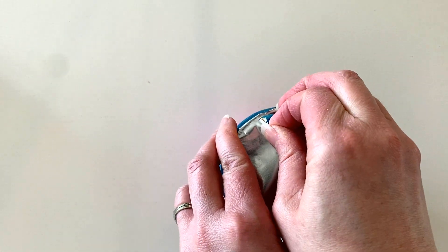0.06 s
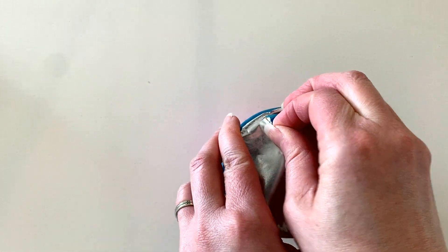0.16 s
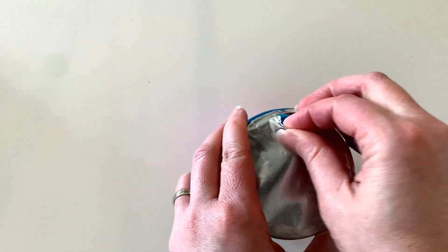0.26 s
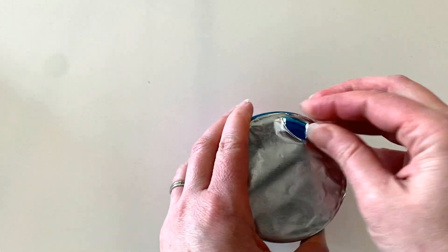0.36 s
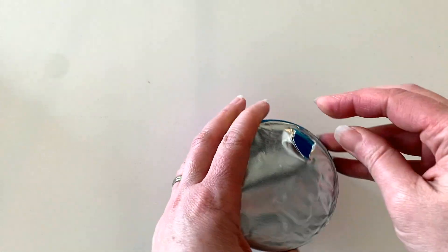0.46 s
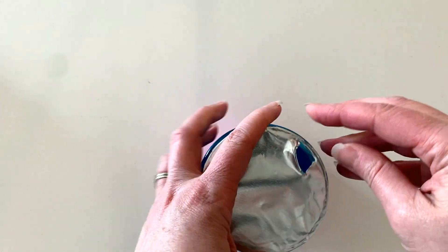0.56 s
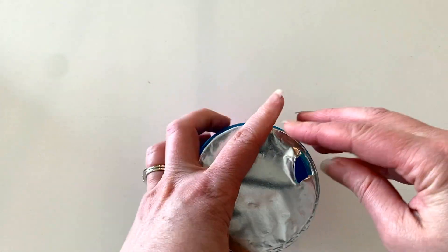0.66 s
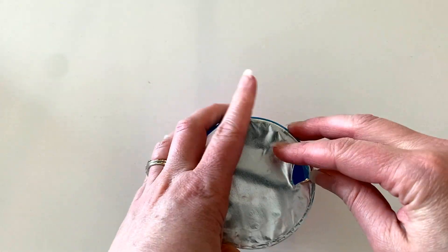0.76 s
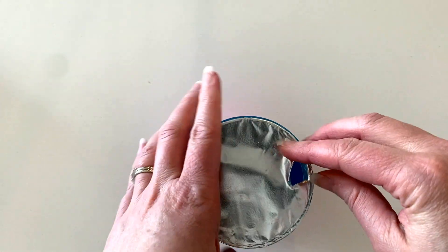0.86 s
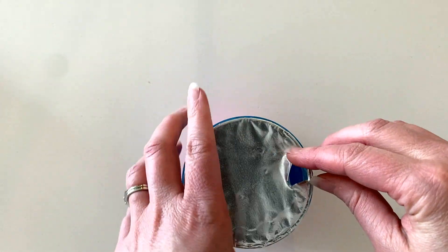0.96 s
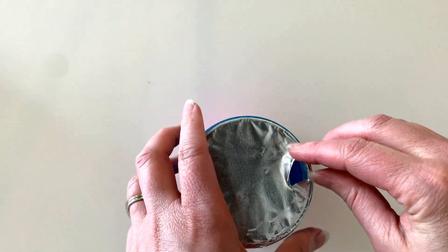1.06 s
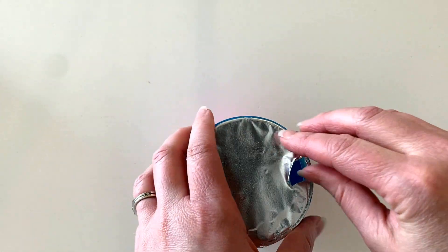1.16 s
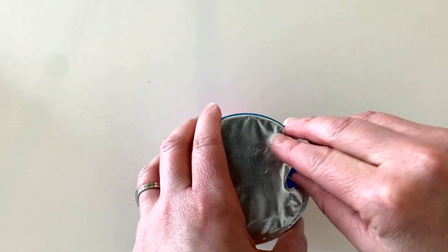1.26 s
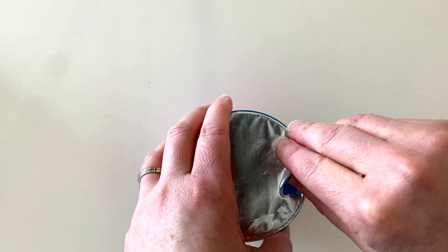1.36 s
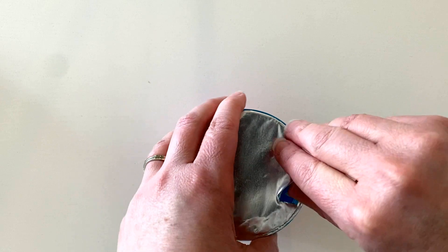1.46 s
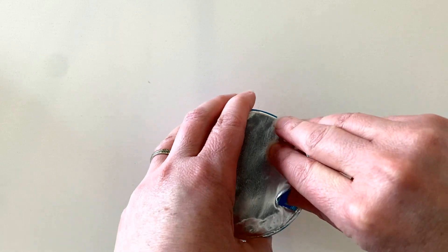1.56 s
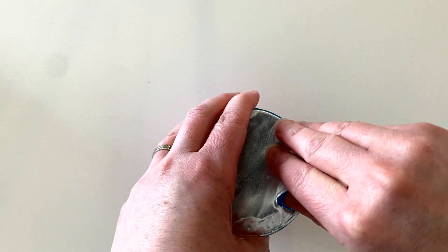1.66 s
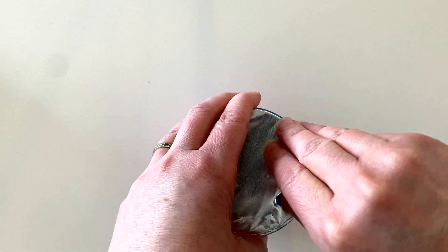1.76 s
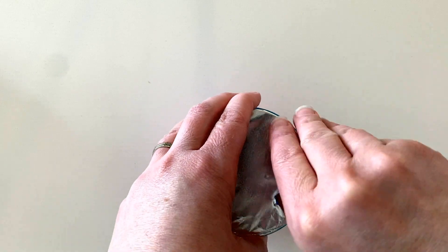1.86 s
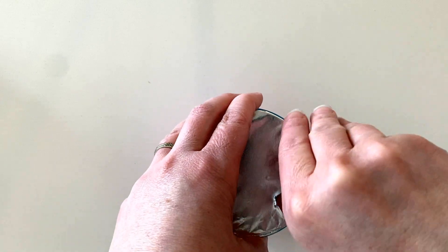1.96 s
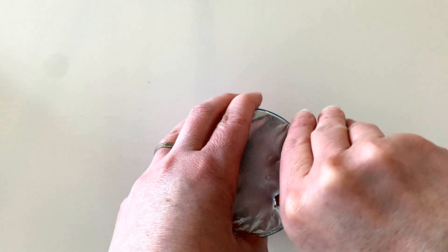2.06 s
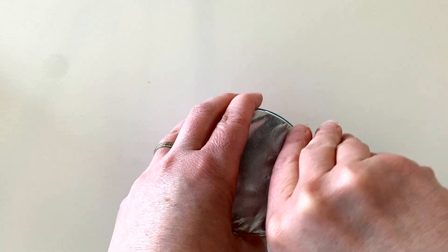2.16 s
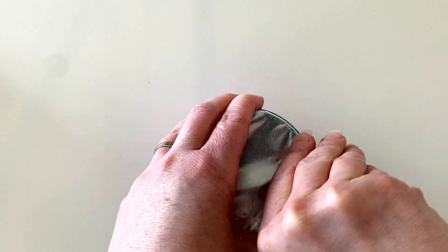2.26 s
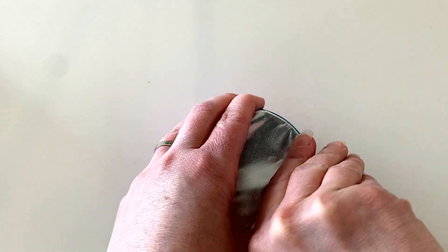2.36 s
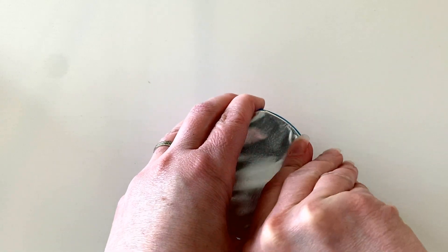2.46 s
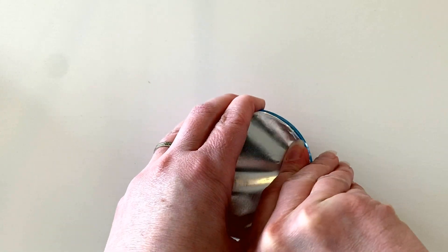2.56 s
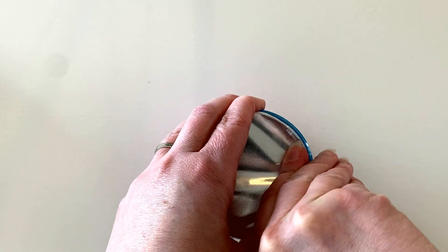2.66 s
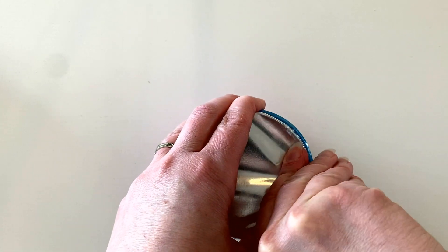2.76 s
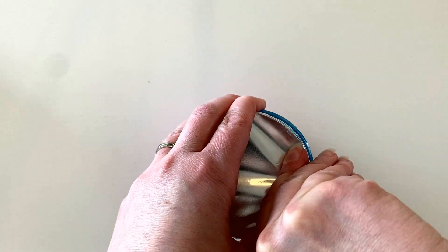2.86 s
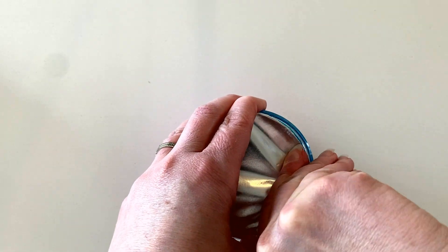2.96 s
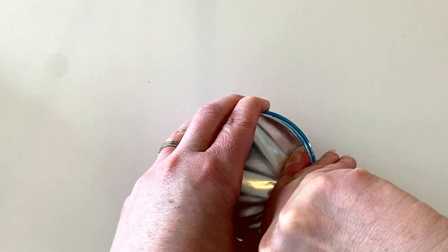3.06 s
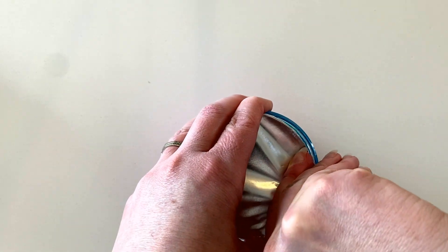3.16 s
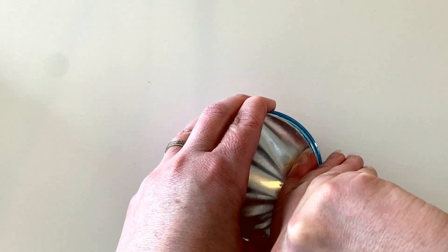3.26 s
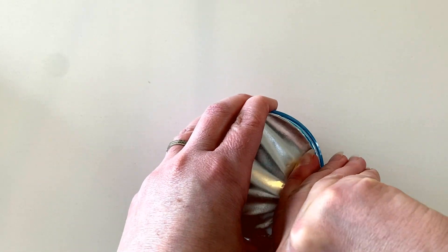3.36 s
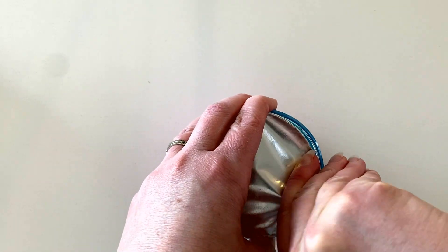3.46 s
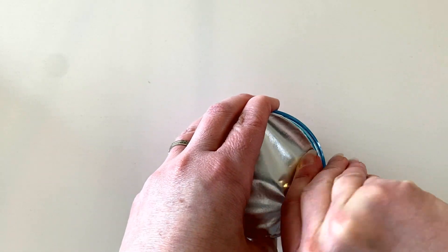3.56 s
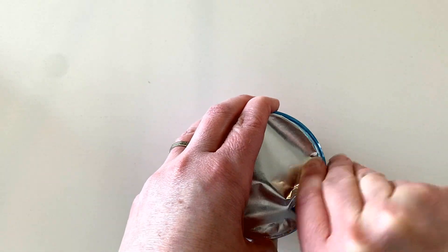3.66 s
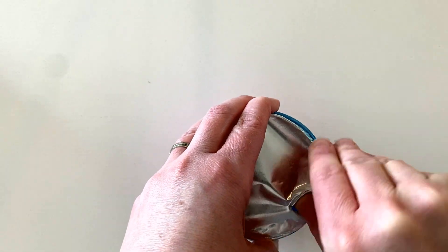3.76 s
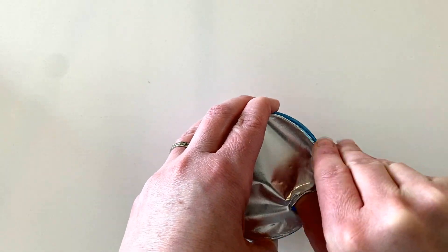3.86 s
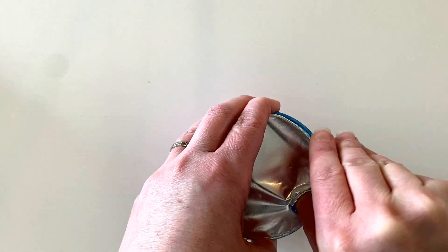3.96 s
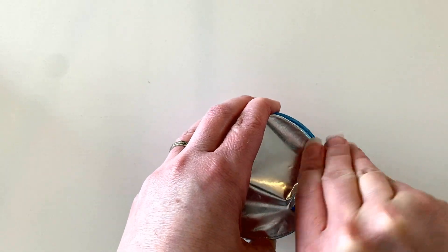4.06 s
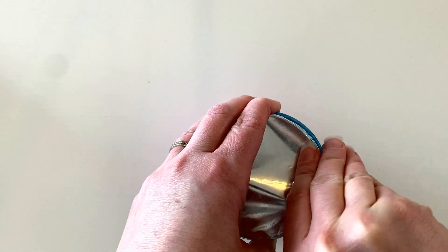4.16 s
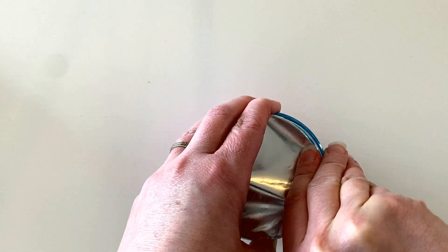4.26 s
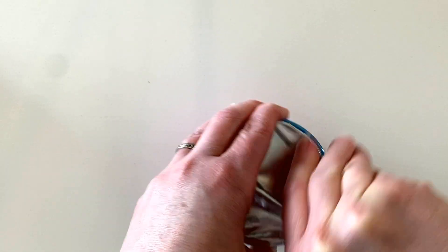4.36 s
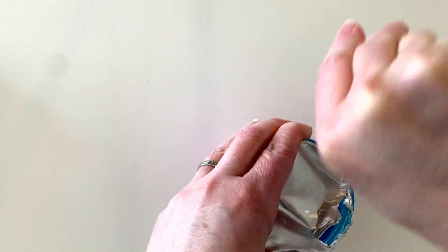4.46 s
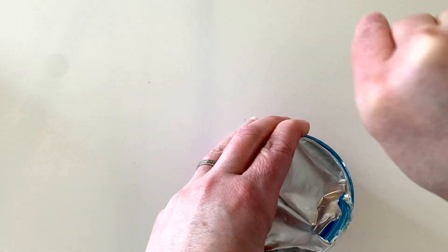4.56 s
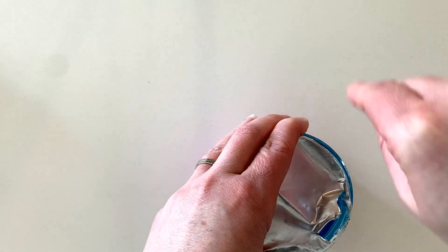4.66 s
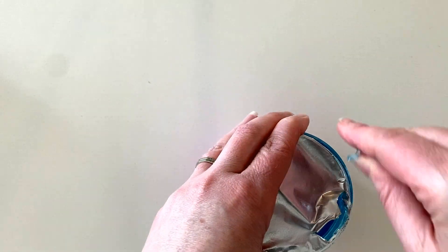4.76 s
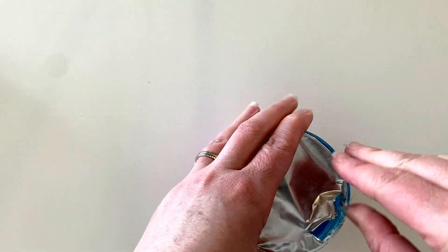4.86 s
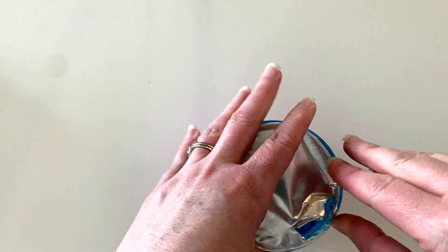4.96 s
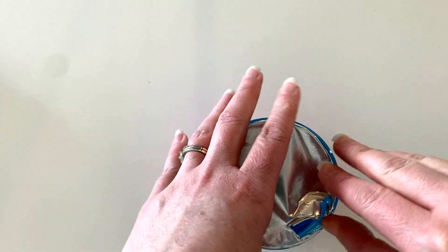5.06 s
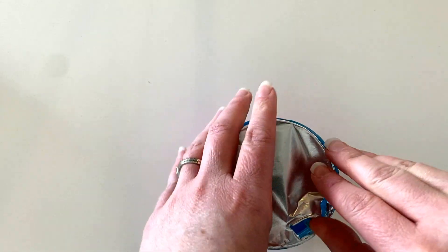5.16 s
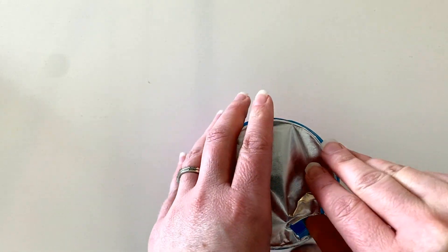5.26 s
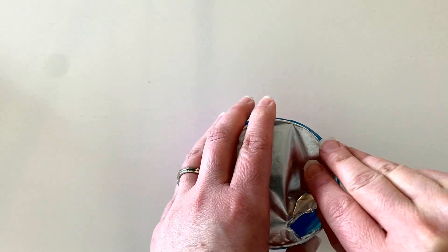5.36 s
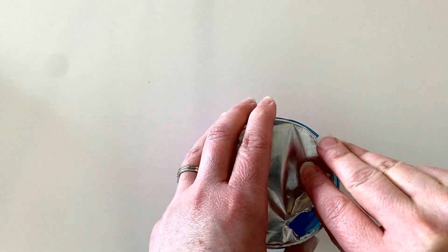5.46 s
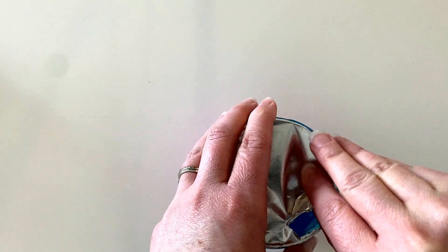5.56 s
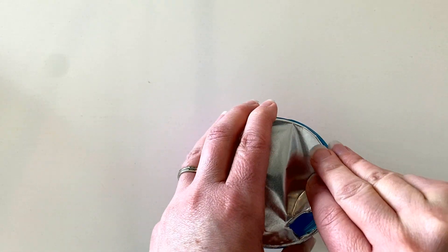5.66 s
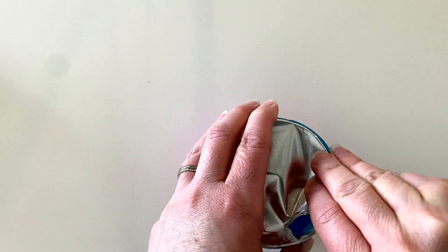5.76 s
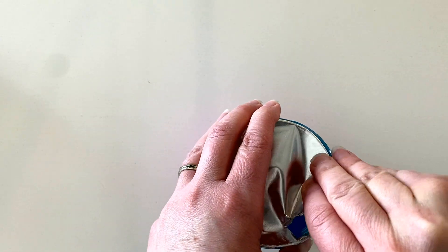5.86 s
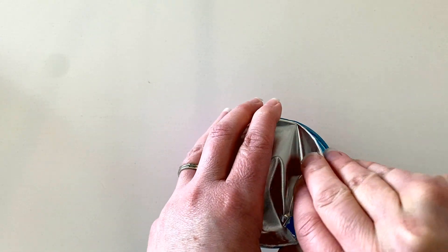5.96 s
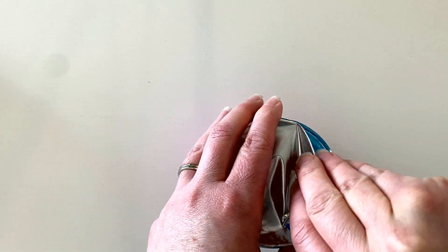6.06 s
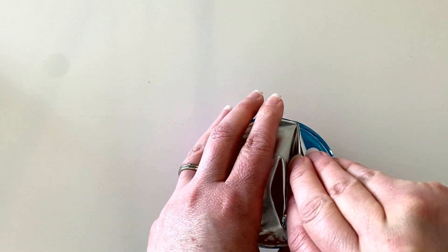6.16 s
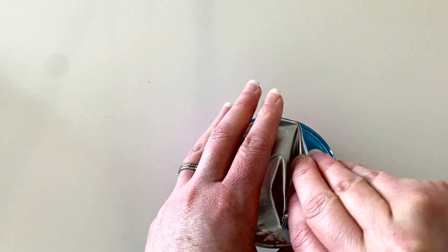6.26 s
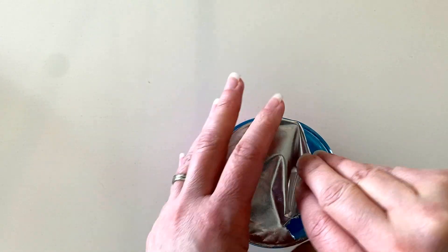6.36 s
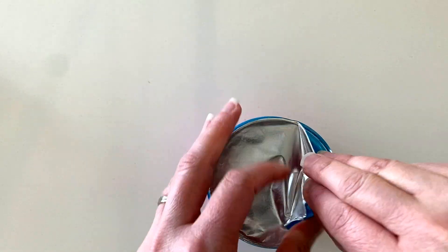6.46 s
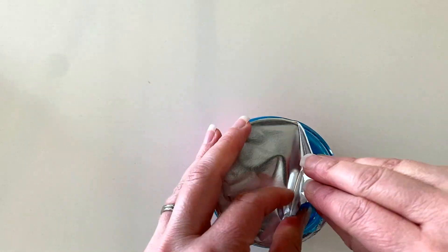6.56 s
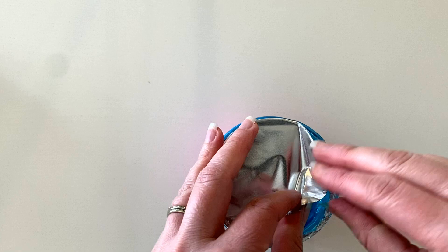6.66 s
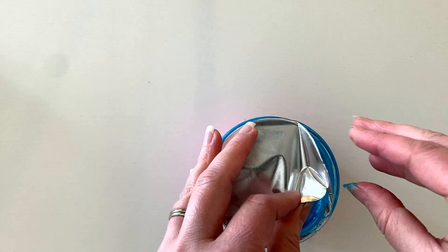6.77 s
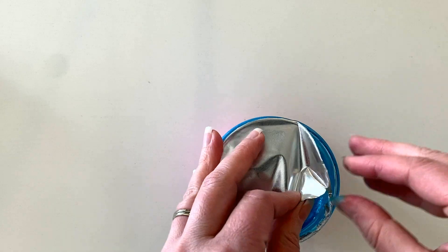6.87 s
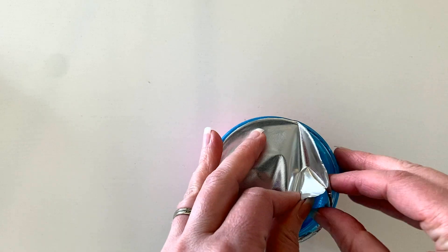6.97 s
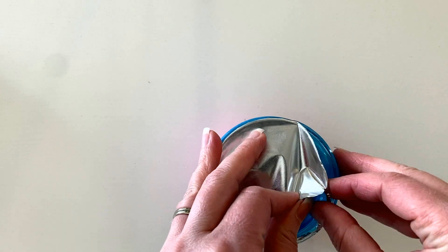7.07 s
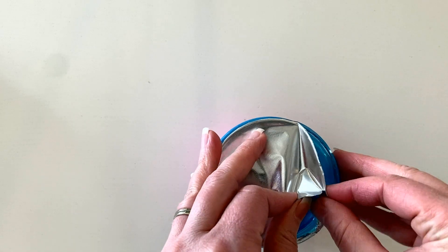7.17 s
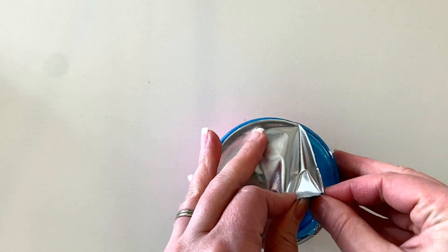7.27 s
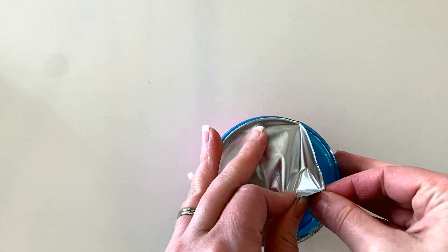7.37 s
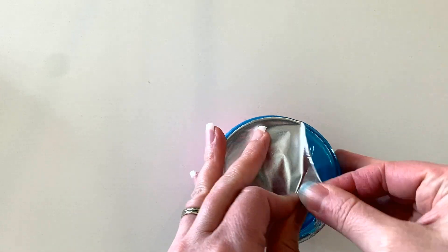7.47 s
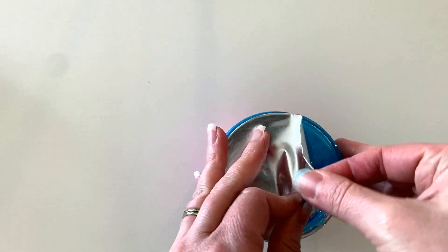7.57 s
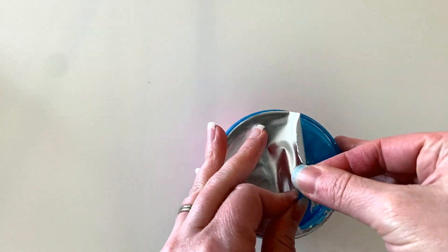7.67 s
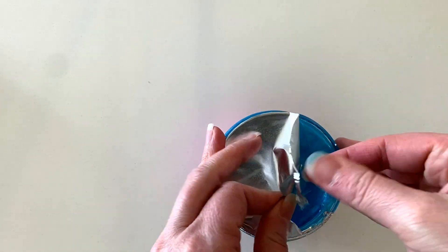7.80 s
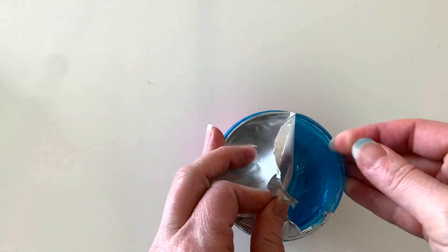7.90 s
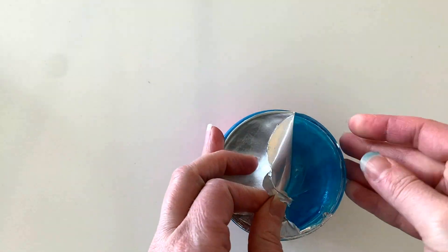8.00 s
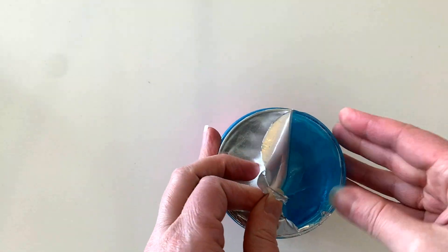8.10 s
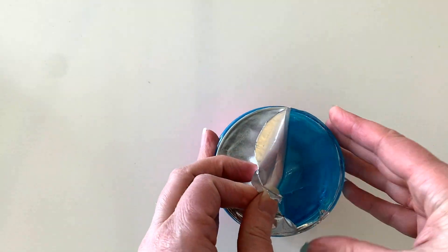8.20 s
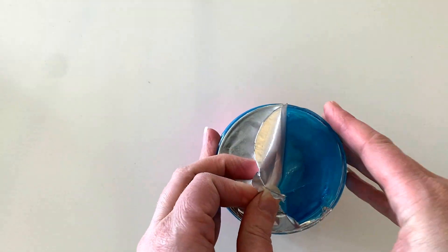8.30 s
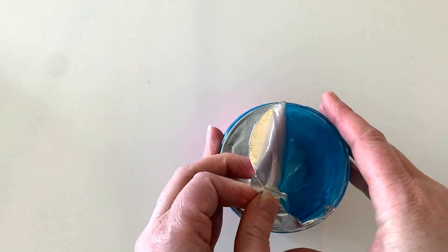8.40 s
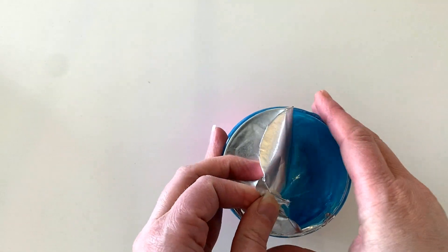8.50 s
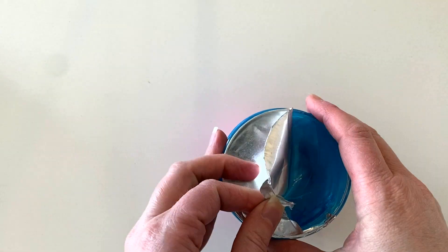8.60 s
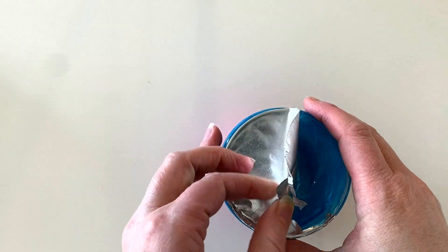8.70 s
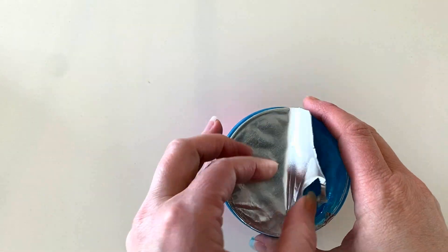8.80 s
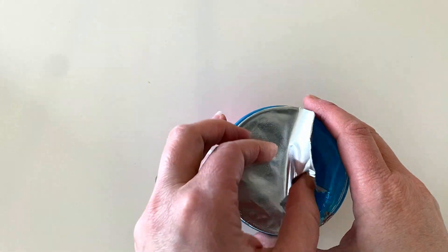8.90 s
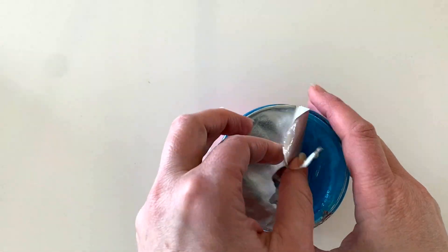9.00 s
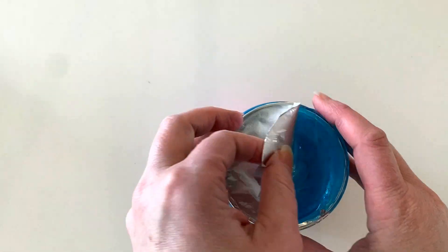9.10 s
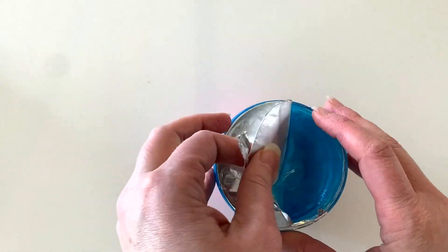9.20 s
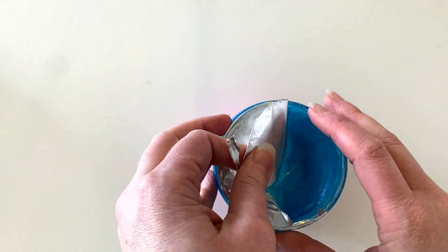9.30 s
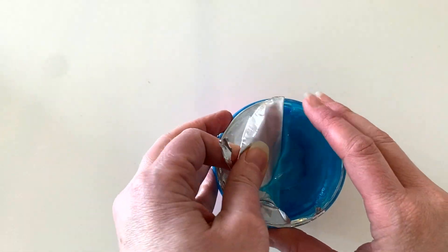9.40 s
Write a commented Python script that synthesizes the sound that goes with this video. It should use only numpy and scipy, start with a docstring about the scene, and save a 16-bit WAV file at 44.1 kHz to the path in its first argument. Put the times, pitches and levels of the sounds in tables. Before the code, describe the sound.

Irregular tin-lid clicks and pops from a foil lid being picked and peeled off a plastic tub, with one loud snap and faint table knocks.

```python
"""Foil clicks and pops like a tin lid as fingers pick at the seal of a plastic tub and peel it back.
Each click is a crease snap, a falling panel pop and a tub knock; the glue lets go in clumps of ticks.
The tub also rings from blows, thumps the table and slides on it, close to a small stereo microphone.
Decaying noise makes the quiet room's answer; shaped noise and wandering sines make its air and low hum."""
import sys
import numpy as np
from scipy import signal
from scipy.fft import rfft, irfft, next_fast_len
from scipy.io import wavfile
from scipy.ndimage import uniform_filter1d, map_coordinates

SR = 44100
rng = np.random.default_rng(int(sys.argv[2]) if len(sys.argv) > 2 else 0)


def generate_wav(signal):
    """Clip the signal to [-1, 1] and save it as 16-bit WAV at the path in sys.argv[1]."""
    frames = np.transpose(np.atleast_2d(signal))
    scaled = np.clip(frames, -1, 1) * 32767
    pcm = np.round(scaled).astype(np.int16)
    wavfile.write(sys.argv[1], SR, pcm)


N = 416304  # length of the scene in samples
SIZE = 4096  # length of one click in samples

# the seal peeling and creasing: middle_s, half_length_s, relative_level_db
PEELS = [(2.563, .03, -59.5), (4.114, .035, -63.5), (4.995, .06, -64), (5.358, .04, -56.5),
         (5.71, .08, -63), (5.934, .04, -63), (6.178, .034, -52.5), (6.676, .02, -53), (7.012, .026, -59),
         (7.502, .039, -41), (7.79, .017, -53), (8.14, .07, -64), (8.285, .04, -57), (8.6, .034, -65),
         (8.948, .025, -52), (9.06, .011, -50), (9.245, .076, -61), (9.405, .046, -56)]


def amp(db):
    """Decibels to gain."""
    return 10 ** (np.asarray(db) / 20)


def unit(x):
    """Scaled to rms 1."""
    return x / np.sqrt(np.mean(x ** 2) + 1e-20)


def along(points, hz):
    """Values read from (Hz, value) points on a log frequency axis."""
    f, v = np.transpose(points)
    return np.interp(np.log(hz + 1), np.log(f + 1), v)


def wobble(rate):
    """A smooth random curve with this many knots a second."""
    knots = rng.standard_normal(int(N * rate / SR) + 4)
    return map_coordinates(knots, [np.arange(N) * rate / SR])


def filtered(x, response):
    """x times a response of frequency."""
    m = next_fast_len(N + SR // 2)
    return irfft(rfft(x, m) * response(np.fft.rfftfreq(m, 1 / SR)), m)[..., :N]


def coloured(x, points):
    """x given a spectrum, at rms 1."""
    return unit(filtered(x, lambda hz: amp(along(points, hz))))


def causal(gain):
    """The minimum-phase response with this gain: it rings only after the blow."""
    cepstrum = irfft(np.log(np.maximum(gain, 1e-6)))
    cepstrum[1:SIZE // 2] *= 2
    cepstrum[SIZE // 2 + 1:] = 0
    return np.exp(rfft(cepstrum))


def resonance(hz, centre_hz, width_hz):
    """A single damped mode, with a peak gain of 1."""
    return 1j * hz * width_hz / (centre_hz ** 2 - hz * hz + 1j * hz * width_hz)


def add(track, s, sound):
    """Mix a sound in at time s."""
    part = track[round(s * SR):][:len(sound)]
    part += sound[:len(part)]


def burst(response, echo_db, t60):
    """A pulse and its dense, dying reflections through a response; rms 1 when counted over 10 ms."""
    t = np.arange(SIZE) / SR
    echoes = rng.standard_normal(SIZE) * amp(-60 * t / t60) * (1 - np.exp(-t / .0015))
    echoes = echoes / np.linalg.norm(echoes)
    wave = irfft(response * (1 + amp(echo_db) * rfft(echoes)))
    return wave / np.linalg.norm(wave) * np.sqrt(SR / 100)


def clicks():
    """A crease snaps, the foil panel flips with a short falling pop and settles; the held tub knocks."""
    # the foil clicks under a finger: start_s, panel_pop_db, crease_snap_db, edge_tick_db
    finger_clicks = [(.3385, -28, -48, -50), (.3504, -38, -45, -38), (.7572, -48, -45, -54),
                     (.9118, -21.5, -28.5, -45), (.9191, -27, -47, -68), (1.0003, -45, -53, -71),
                     (1.7693, -27, -36, -44), (2.221, -32, -52, -66), (2.2337, -38, -48, -57),
                     (2.2688, -31, -40, -44), (2.2864, -35, -63, -60), (2.4, -48, -70, -85),
                     (2.496, -41, -49, -68), (2.537, -35, -43, -74), (2.5512, -35, -41, -42),
                     (2.5968, -41, -58, -79), (2.671, -66, -71, -58), (3.3195, -43, -54, -55),
                     (3.4141, -43, -48, -71), (3.4512, -31.5, -34, -38), (3.4932, -38, -64, -78),
                     (3.5382, -41, -55, -80), (3.5932, -34, -38, -45), (3.633, -44, -58, -63),
                     (3.6668, -34, -55, -80), (3.7043, -53, -55, -54), (3.9382, -34, -57, -95),
                     (4.0055, -38, -50, -76), (4.1993, -43, -58, -89), (4.3331, -33, -36, -51),
                     (4.3739, -13.5, -18.5, -17.5), (4.3881, -23.5, -36, -32), (4.4849, -34, -52, -59),
                     (4.6872, -35, -48, -89), (4.7625, -62, -45, -47), (4.8309, -42, -64, -95),
                     (4.9018, -38, -45, -83), (5.003, -38, -52, -80), (5.0777, -30, -37, -52),
                     (5.2217, -50, -51, -60), (5.3278, -42, -54, -54), (5.5845, -30, -50, -78),
                     (5.5928, -36, -41, -53), (5.6391, -36, -45, -60), (5.6524, -33, -34, -37),
                     (5.6818, -33, -41, -59), (5.7855, -30, -50, -65), (5.9074, -38, -40, -51),
                     (5.9635, -37, -68, -91), (6.2, -44, -46, -65), (6.316, -48, -47.5, -48),
                     (6.3224, -33, -52, -75), (6.434, -41, -62, -82), (6.4636, -35, -54, -84),
                     (6.5443, -33, -51, -55), (6.564, -26, -38, -43), (6.9119, -40, -42, -65),
                     (6.947, -30.5, -45, -61), (7.074, -30, -44, -69), (7.1828, -38, -38.5, -47.5),
                     (7.1857, -24.5, -60, -68), (7.2201, -61, -65, -50), (7.3275, -32, -61, -80),
                     (7.446, -39, -37.5, -31), (7.477, -22, -43, -31), (7.5068, -33, -35, -33),
                     (7.515, -20, -26, -34), (7.6508, -54, -41, -65), (7.7019, -38, -57, -90),
                     (7.7422, -41, -74, -89), (7.7943, -40, -41, -43), (7.846, -30, -58, -78),
                     (7.8962, -40, -69, -84), (8.0079, -23.5, -36, -37.5), (8.0646, -42, -39, -43),
                     (8.2063, -38, -62, -71), (8.271, -37, -66, -80), (8.3345, -36, -54, -64),
                     (8.3397, -28.5, -41, -63), (8.3664, -30, -34, -38), (8.4716, -19, -31, -36),
                     (8.558, -28.5, -49, -82), (8.6457, -37, -64, -80), (8.706, -53, -55, -54),
                     (8.8078, -33, -35, -39), (8.835, -19.5, -46, -58), (8.9416, -44, -60, -42),
                     (9.0492, -58, -52, -48), (9.1839, -33, -32, -38), (9.2864, -58, -49, -60)]
    # how firmly the hands hold the tub against the table: time_s, knock_over_pop_db
    grip = [(0, -6), (.9, -9), (1.8, -2), (2.4, 4), (3.55, 5), (3.8, -4), (4.2, 6), (4.37, -3.5), (4.7, -9),
            (5.8, -8), (7.5, -17), (9.44, -23)]
    # modes of the tub wall: centre_hz, width_hz, level_db
    tub_modes = [(215, 86, -5), (340, 150, -1.5), (408, 73, 3.5), (495, 110, -5.5)]
    # colour of a crease snap: frequency_hz, level_db
    snap_colour = [(1100, -23), (1850, -15), (2250, 1), (3150, -2), (3700, -6), (4300, -13), (5000, -16.5),
                   (7000, -61.5)]
    # colour of an edge tick: frequency_hz, level_db
    tick_colour = [(2500, -30.5), (4000, -5.5), (5000, 4), (6200, 0.5), (7000, -2.5), (8200, -3),
                   (10500, -4.5), (12400, -9), (15000, -8.5), (16400, -13)]
    # pitch of a flat seal's pop when its snap and knock are as loud as itself
    base_pop_hz = 1370
    # a sharper crease and a firmer grip both raise the pop
    sharp_oct_per_db, taut_oct_per_db = .012, .007
    # the panel settles with a second, lower pop
    rebound_s, rebound_level_db, rebound_ratio = .006, -7.5, .74
    fold_start_s, fold_end_s = 7.5, 8.0  # the seal is folded back between these times
    # folded, the panel is smaller and stiffer, so its lowest note rises
    flat_edge_hz, folded_edge_hz = 620, 830
    # folded, it also pops higher and rebounds less
    folded_rise_oct, folded_rebound_db = .16, -7

    foil, knocks = np.zeros(N), np.zeros(N)
    hz = np.fft.rfftfreq(SIZE, 1 / SR)

    def late(s):
        """A delay of s seconds."""
        return np.exp(-2j * np.pi * hz * s)

    # bending waves carry high notes fastest, so each pop is a downward chirp: 1.3 ms late at 1 kHz
    bending = np.exp(-4j * np.pi * .0013 * np.sqrt(1000 * hz))

    def flip(pitch_hz, panel, crease):
        """The foil panel popping around one pitch."""
        peak = 1 / (1 + (np.log((hz + 1) / pitch_hz) / 0.36) ** 2)
        return causal(panel * amp(crease / 2) * peak) * bending

    # neighbouring modes move in opposite senses
    tub = sum((-1) ** k * amp(db) * resonance(hz, centre_hz, width_hz)
              for k, (centre_hz, width_hz, db) in enumerate(tub_modes))
    tub = tub * causal(1 / (1 + (hz / 750) ** 4)) * late(.002)
    # the stiff rim of the seal adds a short ping to every snap
    ping = 1 + amp(-1.5) * resonance(hz, 3180, 130)

    for s, pop_db, snap_db, tick_db in finger_clicks + strays():
        grip_db = np.interp(s, *np.transpose(grip))
        folded = np.interp(s, [fold_start_s, fold_end_s], [0, 1])
        sharp_db = min(snap_db - pop_db, 0)
        rise_oct = sharp_oct_per_db * sharp_db + taut_oct_per_db * grip_db + folded_rise_oct * folded
        pop_hz = base_pop_hz * 2 ** rise_oct
        edge_hz = flat_edge_hz + folded * (folded_edge_hz - flat_edge_hz)
        panel = 1 / np.sqrt((1 + (edge_hz / (hz + 1)) ** 16) * (1 + (hz / 1930) ** 14))
        rebound_db = pop_db + rebound_level_db + folded_rebound_db * folded
        # every crease has its own shape, hence its own peaks and dips, in dB
        crease = 3.34 * map_coordinates(rng.standard_normal(64), [hz / 550], mode="mirror")
        # a faint crease that ticks more than it snaps is a small one, with a brighter top
        small_db = np.clip(tick_db - snap_db + 1.5 - 0.36 * max(tick_db + 34, 0), -10, 9)
        small = small_db * np.clip((hz - 7000) / 7500, 0, 1)
        snap = causal(amp(along(snap_colour, hz) + crease)) * ping * bending
        tick = causal(amp(along(tick_colour, hz) + crease + small)) * late(0.00034)
        pop = flip(pop_hz, panel, crease)
        rebound = flip(pop_hz * rebound_ratio, panel, crease)
        settle_s = s + rebound_s * rng.uniform(.6, 1.4)
        add(foil, s, amp(pop_db) * burst(pop, echo_db=-4, t60=0.043))
        add(foil, settle_s, amp(rebound_db) * burst(rebound, echo_db=-4, t60=.035))
        add(foil, s, amp(snap_db) * burst(snap, echo_db=-4.5, t60=.027))
        add(foil, s, amp(tick_db) * burst(tick, echo_db=-3.0, t60=0.025))
        add(knocks, s, amp(pop_db + grip_db) * burst(tub, echo_db=-0.5, t60=.055))
    return foil, knocks


def strays():
    """Each peel sets off three small creases at chance moments: start_s, pop_db, snap_db, tick_db."""
    over_db = np.array([-2, -1, -3])  # pop, snap and tick over the peel's level
    scatter_db = 2.5
    return [(s + half * rng.uniform(-1, 1), *(db + over_db + rng.normal(0, scatter_db)))
            for s, half, db in PEELS for _ in range(3)]


def peeling():
    """The glue lets go in clumps of tiny ticks of very unequal size."""
    # colour of the crinkling foil: frequency_hz, level_db
    crinkle = [(800, -22), (1800, 3.5), (3200, 5), (4200, 2.5), (6200, 0), (9000, -7), (12400, -7.5),
               (15000, -4), (16400, -14)]
    t = np.arange(N) / SR
    effort = sum(amp(db) * np.exp(-((t - s) / half) ** 2) for s, half, db in PEELS)
    starts = rng.random(N) < 1100 / SR  # about 1100 ticks a second
    sizes = starts * amp(np.minimum(4.5 * rng.exponential(size=N), 16))
    # each tick is a noisy flutter that dies within about a millisecond
    ticks = signal.lfilter([1], [1, -np.exp(-1 / (.0007 * SR))], sizes)
    flutter = (unit(ticks) + .45) * rng.standard_normal(N)
    z = signal.stft(flutter, nperseg=128)[2]
    # neighbouring wrinkles differ in size, so each favours its own band
    wrinkles = uniform_filter1d(rng.standard_normal(z.shape), size=7, axis=0)
    wrinkles = unit(uniform_filter1d(wrinkles, size=3, axis=1))
    rustle = signal.istft(z * amp(4.6 * wrinkles), nperseg=128)[1][:N]
    return amp(3.5) * effort * coloured(rustle, crinkle)


def blows():
    """A hard blow rings the modes of the whole tub, and its base rubs briefly on the table."""
    # the tub striking the table: strike_s, relative_level_db
    strikes = [(.341, -38), (.914, -37), (1.77, -51.5), (4.375, -23.5)]
    # what the struck tub rings with: frequency_hz, level_db, t60_s
    ring_modes = [(431, -6, 0.15), (634, 2, 0.34), (733, 2, 0.26), (819, 0.5, 0.22), (946, -4, 0.18),
                  (1040, -5, .14), (1360, -5.5, .1), (1647, -4.5, 0.29), (2163, -4, .14), (2450, -7, .14),
                  (3020, -10.5, .14), (4620, -6.5, .06), (6010, -13.5, .08), (6340, -13, .08),
                  (8190, -19, .06)]
    out, t = np.zeros(N), np.arange(SR // 2) / SR
    onset = 1 - np.exp(-t / .001)
    for s, db in strikes:
        ring = np.zeros(len(t))
        for hz, level, t60 in ring_modes:
            # the fingers on the wall keep the modes from ringing purely
            drift = 0.0038 * np.cumsum(rng.standard_normal(len(t)))
            ring += amp(level - 60 * t / t60) * np.sin(2 * np.pi * (hz * t + drift))
        band = signal.butter(1, [500, 2200], "bandpass", fs=SR)
        rub = signal.lfilter(*band, rng.standard_normal(len(t)))
        add(out, s, amp(db - 4) * (ring + rub * amp(5 - 60 * t / 0.14)) * onset)
        # a scuff leads in
        add(out, s - .012, amp(db - 2.5) * rub * np.exp(-((t - .009) / 0.0066) ** 2))
    return out


def thumps():
    """The table top gives a low, dead note of three dying modes under the tub."""
    # the tub pressed on to the table: press_s, level_db
    presses = [(4.374, -24.5), (4.429, -24), (7.52, -29.5), (7.555, -33), (8.498, -28)]
    table_modes = [(48, -7, 0.1), (79.6, -3, 0.22), (175, 0, 0.078)]  # frequency_hz, level_db, t60_s
    out, t = np.zeros(N), np.arange(SR // 3) / SR
    note = sum(amp(level - 60 * t / t60) * np.sin(2 * np.pi * hz * t) for hz, level, t60 in table_modes)
    for s, db in presses:
        add(out, s, amp(db) * note * (1 - np.exp(-t / 0.001)))
    return out


def sliding():
    """The base of the tub brushes over the table as it is turned: noise that follows the speed."""
    # the tub turning on the table: fastest_s, slowing_s, level_db
    turns = [(.33, .58, -45), (1.3, .34, -50)]
    # colour of the brushing base: frequency_hz, level_db_per_hz
    scrape = [(150, -16), (300, -1.5), (440, -0.5), (560, -5.5), (740, 0), (950, -7), (1360, -4),
              (1700, -17), (2900, -20), (4500, -25.5), (6000, -24.5), (7200, -31.5), (9800, -31.5),
              (13000, -56)]
    # a quick push, then ever faster fading
    rise_db_per_s, fall_db, fall_power = 135, 15, 1.7
    t = np.arange(N) / SR
    speed = np.zeros(N)
    for s, slowing, db in turns:
        push_db = rise_db_per_s * np.maximum(s - t, 0)
        fade_db = fall_db * (np.maximum(t - s, 0) / slowing) ** fall_power
        speed += amp(db - push_db - fade_db)
    roughness = amp(0.98 * wobble(36) + 1.2 * wobble(440))
    return speed * roughness * coloured(rng.standard_normal(N), scrape)


def ports(x):
    """The near sound reaches the two microphone ports with its own delay and shading."""
    # phase between the ports: frequency_hz, left_lead_radians
    lead = [(1800, 0), (3500, 1), (4300, 1.3), (4700, 3), (5300, 6), (6000, 7), (9000, 8.1), (14000, 9.1)]
    # level between the ports: frequency_hz, left_minus_right_db
    lean = [(120, 0), (300, 2), (700, .7), (1300, 0), (2400, -1), (3200, -3), (4500, -3), (5500, .5),
            (7000, -1), (10000, 0)]
    sign = np.array([[1], [-1]]) / 2  # half the difference to each port
    return filtered(x, lambda hz: amp(sign * along(lean, hz)) * np.exp(1j * sign * along(lead, hz)))


def room(x):
    """The walls answer with decaying noise; the ports hear the same bass but their own treble."""
    # decay of the room: frequency_hz, t60_s
    decay = [(150, 1), (500, 0.35), (1500, 0.49), (4000, 0.44), (8000, 0.28), (15000, 0.072)]
    # colour of the room's answer: frequency_hz, level_db
    walls = [(150, -0.5), (330, -2.5), (500, -4), (750, 5.5), (1300, -6), (2100, 1.5), (3300, -1),
             (6000, -0.5), (10000, 1.5), (15000, -14.5)]
    step, wet = SR // 3, np.zeros((2, N))
    # each third of a second of sound gets a freshly drawn room tail
    for start in range(0, N, step):
        hz, t, z = signal.stft(rng.standard_normal((2, step)), SR, nperseg=256)
        z = z * amp(-60 * t / along(decay, hz)[:, None]) * (1 - np.exp(-t / 0.0022))
        tail = signal.istft(z, SR, nperseg=256)[1]
        tail = tail / np.linalg.norm(tail[0])
        answer = signal.fftconvolve(x[None, start:start + step], tail, axes=1)
        for track, sound in zip(wet, answer):
            add(track, start / SR, sound)

    def spread(hz):
        """Mid and side gains: all mid in the bass, equal shares from 2 kHz up."""
        turn = np.pi / 4 * np.minimum(hz / 2000, 1)
        return amp(along(walls, hz)) * [np.cos(turn), np.sin(turn)]

    mid, side = filtered(wet, spread)
    return np.array([mid + side, mid - side])


def background():
    """Soft room noise and the hum of an appliance, alike at both ports, over their own faint hiss."""
    # room noise: frequency_hz, level_db_per_hz
    air_colour = [(20, -42.5), (32, -24), (50, -19), (80, -20), (110, -6.5), (200, -20), (300, -26.5),
                  (450, -32), (950, -36.5), (1900, -49), (2600, -49), (4000, -74), (7000, -77),
                  (12000, -89), (15000, -100)]
    # each port's own noise: frequency_hz, level_db_per_hz
    hiss_colour = [(100, -18.5), (400, 21), (1000, 13), (2600, -1), (4200, -12), (7000, -20.5),
                   (12000, -24), (14000, -45.5)]
    # the hum: frequency_hz, rms_level_db, wander_hz
    hum_tones = [(119.9, -33, 0.4), (55.1, -48, 2), (59.4, -48, 1), (165.1, -51, 3), (219.6, -60, 3),
                 (272.8, -66, 3)]
    t = np.arange(N) / SR
    air = amp(-41.5) * coloured(rng.standard_normal(N), air_colour)
    hiss = amp(-54) * coloured(rng.standard_normal((2, N)), hiss_colour)
    hum = np.zeros(N)
    for hz, db, wander in hum_tones:
        cycles = hz * t + wander * np.cumsum(wobble(9)) / SR
        hum += amp(db) * np.sqrt(2) * np.sin(2 * np.pi * cycles)
    return air + hiss + hum


def scene():
    """Foil right under the microphone; tub and table send more of their sound into the room."""
    foil, knocks = clicks()
    foil = foil + peeling()
    tub = knocks + blows() + thumps() + sliding()
    return ports(foil + tub) + room(amp(-14) * foil + amp(-8) * tub) + background()


def record(dry):
    """The ports lift the top treble by resonance; the recorder keeps nothing above its band limit."""
    top_hz = 16400
    bright = filtered(dry, lambda hz: amp(8 * np.exp(-((hz - 15200) / 800) ** 2)))
    return filtered(np.clip(bright, -1, 1), lambda hz: hz < top_hz)


dry = scene()
out = record(dry)
generate_wav(out)
```